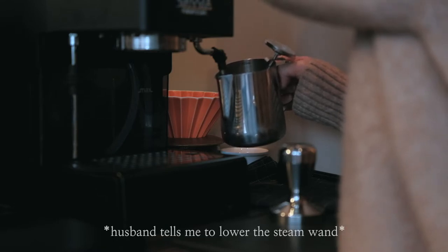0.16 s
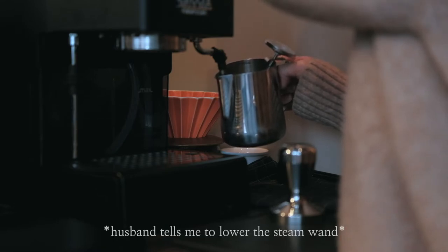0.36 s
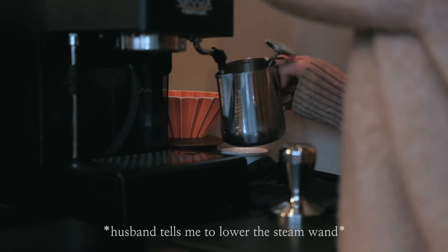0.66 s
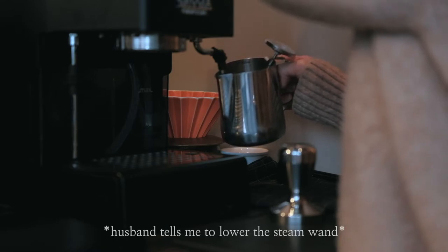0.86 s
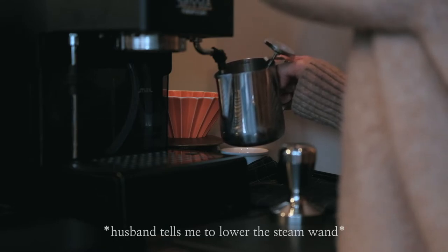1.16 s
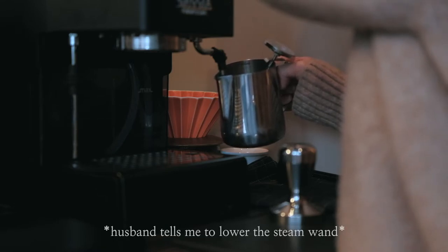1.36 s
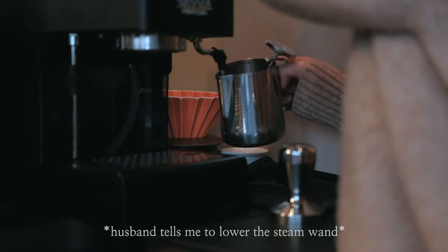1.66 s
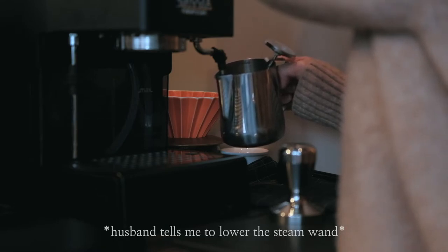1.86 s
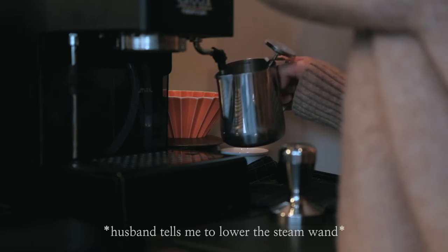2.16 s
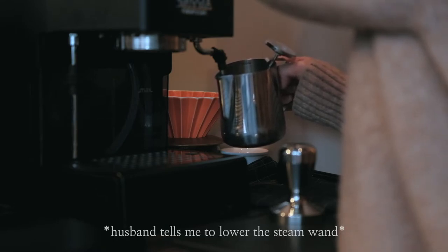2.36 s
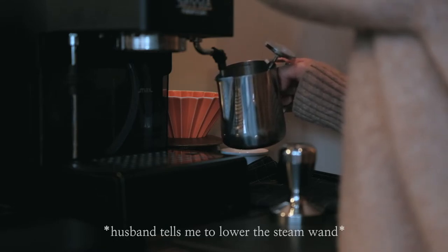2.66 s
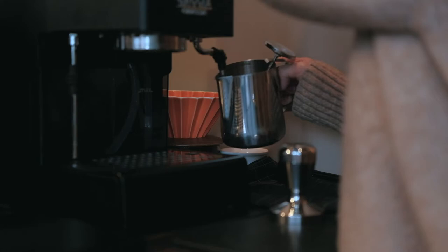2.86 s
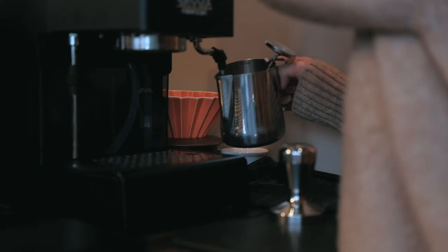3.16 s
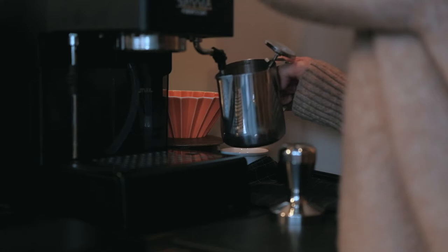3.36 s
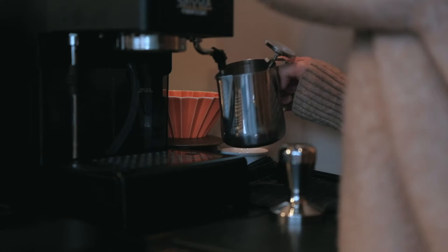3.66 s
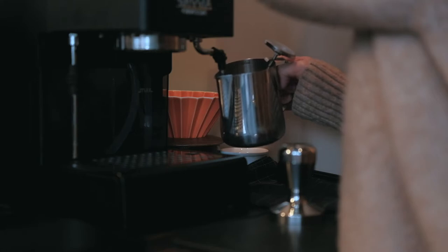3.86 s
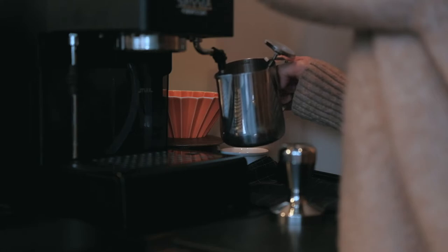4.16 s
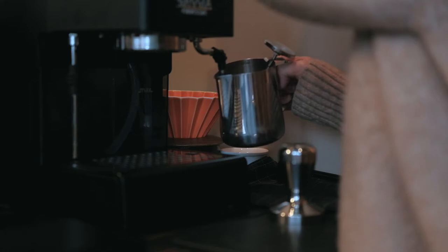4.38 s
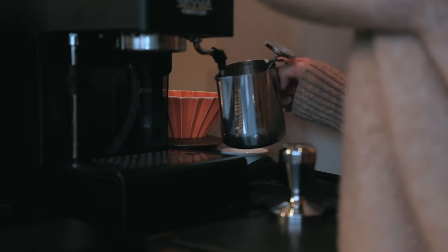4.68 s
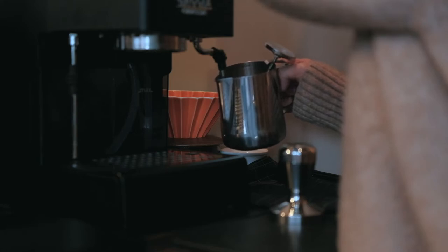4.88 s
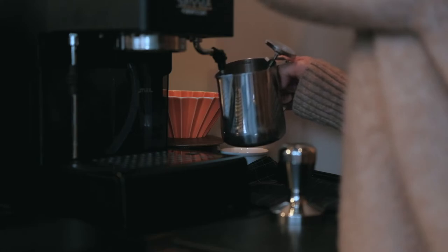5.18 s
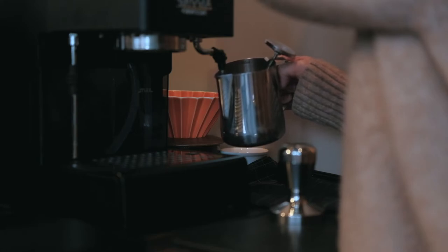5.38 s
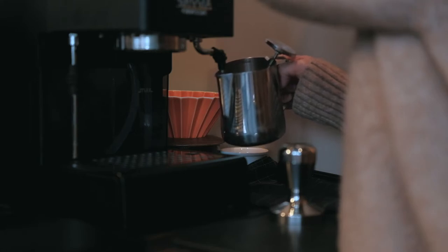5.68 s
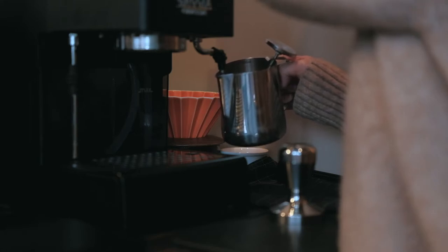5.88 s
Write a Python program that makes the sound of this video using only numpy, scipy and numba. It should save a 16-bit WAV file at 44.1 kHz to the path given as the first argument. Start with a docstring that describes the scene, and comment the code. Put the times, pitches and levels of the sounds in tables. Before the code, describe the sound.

In a small, reflective kitchen, a steam wand is already running in milk inside a steel pitcher, heard close in stereo. From 0 to about 2.4 seconds it makes a coarse, rasping screech, with two unsteady high whistles and rapid squealing surges over airy mist and hollow bubbling. Brief sizzles flicker early; a small spurt and sharp bubble ticks arrive near 2. The screech weakens around 2.4, then at 2.6 bright spray bursts out with a low slurp, sizzles and a stronger tick. A last squeal comes near 2.9. From about 3 seconds the mist thins and a softer, finer hiss takes over, with occasional harder pushes and faint hollow resonance. Around 4.7 to 5 another bright spit and wet gulps break in. The thinner fizz then continues unevenly to the end at 6, over faint low machine and room rumble, slightly stronger later.

```python
"""A steam wand froths milk in a steel pitcher in a small kitchen.
Clicks through moving resonances make a rasping, whistling screech that eases into a softer, finer hiss.
Bright spray spurts out near 2, 2.6 and 4.8 s, with sizzles, gulps and ticks from filtered clicks and noise.
Resonators ring the pitcher's steel and the air over the churning milk; room reflections and a low
filtered-noise rumble surround it."""
import sys
import numpy as np
from scipy import signal
from scipy.fft import rfft, irfft, next_fast_len
from scipy.io import wavfile
from scipy.ndimage import uniform_filter1d
from numba import njit

SR = 44100
rng = np.random.default_rng(int(sys.argv[2]) if len(sys.argv) > 2 else 0)


def digitize_waveform(pressure):
    """Quantize a signal to 16-bit integers and store it at the path in sys.argv[1].

    Rows of a 2-D input are taken as channels; values are limited to [-1, 1].
    """
    field = np.atleast_2d(pressure).T
    bounded = np.clip(field, -1, 1)
    quanta = np.round(bounded * 32767).astype(np.int16)
    wavfile.write(sys.argv[1], SR, quanta)


N = 265834
TIME = np.arange(N) / SR
FREQS = np.maximum(np.fft.rfftfreq(N, 1 / SR), 1)
# Table levels are set before the pitcher, mix and room.


def undb(db):
    """Decibels to gain."""
    return 10 ** (np.asarray(db) / 20)


def curves(table):
    """The columns of a table, joined by straight lines in time."""
    times, *columns = np.transpose(table)
    return [np.interp(TIME, times, column) for column in columns]


def unit(x):
    """Scale to rms 1."""
    return x / np.sqrt(np.mean(x ** 2))


def colour(x, points):
    """Filter by a spectrum of (frequency [Hz], gain [dB]) points, joined on a log-frequency axis."""
    hz, db = np.transpose(points)
    gain = undb(np.interp(np.log(FREQS), np.log(hz), db))
    return irfft(rfft(x) * gain, N)


def ring(x, modes):
    """Pass through parallel resonances of (frequency [Hz], width [Hz], gain [dB])."""
    response = sum(undb(db) / (1 + 1j * (FREQS ** 2 - hz ** 2) / (FREQS * width))
                   for hz, width, db in modes)
    return irfft(rfft(x) * response, N)


def ring_twice(x, hz, width_hz):
    """Two equal resonances in series narrow a shower of clicks to one singing band of rms 1."""
    mode = [(hz, width_hz, 0)]
    return unit(ring(ring(x, mode), mode))


@njit
def sweep(x, hz, width):
    """State-variable band-pass whose centre moves every sample; gain 1 at the centre."""
    y, band, low = np.empty(len(x)), 0., 0.
    for i in range(len(x)):
        g, damping = np.tan(np.pi * hz[i] / SR), width / hz[i]
        v = (band + g * (x[i] - low)) / (1 + g * (g + damping))
        band, low = 2 * v - band, low + 2 * g * v
        y[i] = damping * v
    return y


def sweep_twice(x, hz, width_hz):
    """Two equal moving band-passes in series."""
    return sweep(sweep(x, hz, width_hz), hz, width_hz)


def walk(rate):
    """Smooth random wander of rms 1 that takes a new direction rate times a second."""
    hold = max(int(SR / rate), 2)
    steps = rng.standard_normal(N // 16)[np.arange(N) // hold % (N // 16)]
    return unit(uniform_filter1d(steps, hold))


def pops(per_s, spread_db):
    """A dense shower of tiny clicks with random sign and size, at rms 1."""
    happens = rng.random(N) < per_s / SR
    signs = np.sign(rng.standard_normal(N))
    return unit(happens * signs * undb(spread_db * rng.standard_normal(N)))


def swirl(x, rate, depth_db, count=16):
    """Foam drifting past the tip shades each frequency band in its own time."""
    size = next_fast_len(N)
    hz = np.maximum(np.fft.rfftfreq(size, 1 / SR), 1)
    place = np.interp(np.log(hz), np.log([1500, 16000]), [0, count - 1])
    spectrum = rfft(x, size)
    shaded = 0
    for k in range(count):
        overlap = np.maximum(1 - abs(place - k), 0)  # triangular bands that add up to 1
        band = irfft(spectrum * overlap, size)[:N]
        shaded = shaded + band * undb(depth_db * walk(rate))
    return shaded


def sputter(per_s, fade_s, depth):
    """A gain that jumps at each spit and sinks back exponentially."""
    spits = (rng.random(N) < per_s / SR) * rng.uniform(.4, 1, N)
    fading = signal.lfilter([1], [1, -np.exp(-1 / (fade_s * SR))], spits)
    return unit(1 + depth * fading)


ATTACK_S, RELEASE_S = 0.0092, 0.03  # default ramps of a swell


def swells(rows, attack_s=ATTACK_S, release_s=RELEASE_S):
    """Summed gain of (time [s], length [s], level [dB]) events, timed between half-gain points."""
    total = 0
    for s, length, db in rows:
        rise, fall = (TIME - s) / attack_s, (s + length - TIME) / release_s
        total = total + undb(db) * np.clip(np.minimum(rise, fall) + .5, 0, 1)
    return total


def loudness(db, rows):
    """A running level with events on top, added in power."""
    return np.hypot(undb(db), swells(rows))


# Steaming over time, also played by hiss and churn: (time [s], collapsing-bubble level [dB],
# jet fizz level [dB], rolling-milk level [dB], fizz pitch [Hz])
STEAMING_LEVELS = [(0, -45, -55, -62.5, 4800), (1.0, -44, -53, -62.5, 4430), (1.9, -45.5, -51, -63.5, 4180),
                   (2.0, -46, -50.5, -63, 4280), (2.3, -44.5, -51.5, -62.5, 4100),
                   (2.38, -49.5, -51.5, -65.5, 4200), (2.58, -47, -48.5, -66, 3970),
                   (2.7, -58.5, -50.5, -59, 4230), (3.2, -58, -51, -59, 4280), (3.55, -55, -50, -61, 4380),
                   (3.85, -58.5, -50.5, -65, 4330), (4.55, -59, -52, -66.5, 4300),
                   (4.8, -55.5, -52, -68, 4530), (4.93, -62, -57.5, -66, 4670), (5.06, -66, -51, -67, 4250),
                   (5.28, -62, -54.5, -64, 3800), (5.5, -61, -53.5, -60.5, 3860),
                   (5.67, -58, -54.5, -63, 3820), (5.9, -61, -51.5, -72, 3780), (6.03, -62, -55, -62, 3850)]
# Swells of the screeching bubble cloud: (time [s], length [s], level [dB], resonance [Hz])
CLOUD_SURGES = [(0, 0.056, -42.5, 2740), (0.101, 0.052, -45, 2620), (0.255, 0.018, -43, 3300),
                (0.349, 0.16, -43.5, 2660), (0.561, 0.089, -46, 3730), (0.635, 0.064, -43, 2660),
                (0.736, 0.021, -45.5, 3630), (0.771, 0.094, -50, 2830), (.86, 0.069, -43.5, 3370),
                (0.9, 0.11, -47, 2760), (1.168, 0.064, -45.5, 3300), (1.302, 0.067, -42, 2860),
                (1.488, 0.1, -47, 3470), (1.603, 0.1, -44, 2810), (1.726, 0.078, -48.5, 3580),
                (1.778, 0.056, -41, 2800), (1.846, 0.058, -42.5, 2680), (1.91, 0.046, -40.5, 2650),
                (1.977, 0.13, -49.5, 2830), (2.085, 0.056, -40, 2740), (2.195, 0.05, -40, 3150),
                (2.406, 0.064, -46.5, 3580), (2.468, .03, -44.5, 3070), (2.53, .07, -46.5, 3440),
                (2.882, 0.032, -46, 3680), (2.939, 0.049, -41.5, 2940)]
# Two whistling strands: (time [s], lower pitch [Hz], upper pitch [Hz],
# lower level against the rasp [dB], upper level against the rasp [dB])
WHISTLE_STRANDS = [(0, 2720, 3350, -5, -7), (0.25, 2720, 3140, -9, -2), (0.42, 2684, 3200, -1, -7),
                   (0.6, 2730, 3480, -7.5, -7.5), (0.9, 2685, 3400, -1, -6), (1.22, 2710, 3290, -6, -1.5),
                   (1.42, 2675, 3510, -1, -5), (1.68, 2800, 3510, -1, 0.5), (1.9, 2650, 3300, -1.5, -2.5),
                   (2.0, 2820, 3450, 2, -2), (2.25, 2813, 3540, -3, -3.5), (2.42, 2810, 3600, -12, -11),
                   (2.96, 2930, 3420, -5.5, -8)]
# Tone of collapsing bubbles: (frequency [Hz], gain [dB])
COLLAPSE_TONE = [(1200, -47), (1800, -13.5), (2000, -12), (2380, -7.5), (2620, -5), (3020, -6), (3500, -2),
                 (4300, -14), (5100, -25), (6300, -21), (7800, -36), (9400, -31), (11000, -28),
                 (15500, -46)]
CLOUD_HZ = 3084  # cloud resonance between surges
CLOUD_DRIFT_DB = 0.48  # its pitch wander, as 20 log10 of the frequency ratio
SQUEAL_SHARE = 0.29  # share of a surge's power in one narrow squeal


def screech():
    """Imploding bubbles spit and ring their cloud; two strands whistle and each surge squeals."""
    steady_db, _, _, _ = curves(STEAMING_LEVELS)
    low_hz, high_hz, low_db, high_db = curves(WHISTLE_STRANDS)
    steady_power = undb(steady_db) ** 2
    surges = [(swells([(s, length, db)]) ** 2, hz) for s, length, db, hz in CLOUD_SURGES]
    power = steady_power + sum(surge for surge, _ in surges)

    # The louder of cloud and surge pulls the resonance its way.
    resting_hz = CLOUD_HZ * undb(CLOUD_DRIFT_DB * walk(30))
    cloud_hz = (resting_hz * steady_power + sum(surge * hz for surge, hz in surges)) / power

    spits = sputter(per_s=90, fade_s=0.0032, depth=0.8)
    implosions = pops(per_s=10000, spread_db=2.0) * spits
    cloud = sweep(implosions, cloud_hz * undb(0.36 * walk(70)), 550.0)
    rasp = swirl(implosions, rate=60, depth_db=4.0, count=22)
    wash = unit(colour(0.28 * rasp + cloud, COLLAPSE_TONE))

    def sing(centre_hz, width_hz):
        """Narrow a fresh shower of spitting clicks to a whistle."""
        return unit(sweep_twice(pops(per_s=8000, spread_db=1.5) * spits, centre_hz, width_hz))

    low_strand = undb(low_db) * sing(low_hz * undb(0.15 * walk(35)), 197.0)
    high_strand = undb(high_db) * sing(high_hz * undb(0.25 * walk(25)), 245.0)
    body = (wash + low_strand + high_strand) / np.sqrt(1 + undb(low_db) ** 2 + undb(high_db) ** 2)

    squealing = np.clip(SQUEAL_SHARE * (1 - steady_power / power), 0, 1)
    mixed = np.sqrt(1 - squealing) * body + np.sqrt(squealing) * sing(cloud_hz, 290.0)
    return mixed * np.sqrt(power) * undb(0.67 * walk(45))


# Mist over the foam: (time [s], level [dB])
MIST_LEVEL = [(0, -56), (0.15, -57.5), (0.2, -52), (0.4, -55.5), (0.57, -59.5), (0.7, -56), (0.95, -55.5),
              (1.12, -58.5), (1.38, -56), (1.5, -56.5), (1.92, -56.5), (2.0, -57), (2.4, -57), (2.95, -58),
              (3.05, -74), (5.4, -68), (6.03, -67)]
# Tone of the mist: (frequency [Hz], gain [dB])
MIST_TONE = [(2000, -24), (5000, -8.5), (5600, 4), (5950, 3.5), (6400, 2.5), (7000, -1.5), (8000, -12),
             (8900, 1), (9400, 0), (10100, -5.5), (12000, -7.5), (15500, -16.5)]


def mist():
    """A dense shower of equal droplets makes an airy mist that thins at about 3 s as the tip sinks."""
    level_db, = curves(MIST_LEVEL)
    droplets = pops(per_s=20000, spread_db=0.0) * sputter(per_s=77, fade_s=0.0024, depth=0.37)
    return unit(colour(swirl(droplets, rate=70, depth_db=4.5), MIST_TONE)) * undb(level_db)


# Harder pushes of the jet: (time [s], length [s], level [dB])
JET_PUSHES = [(0.013, 0.055, -50.5), (1.095, 0.034, -51.5), (2.41, 0.075, -53), (2.88, 0.018, -49),
              (3.37, 0.14, -50), (4.118, 0.037, -48.5), (4.18, 0.055, -50.5), (4.755, 0.033, -55),
              (5.208, 0.017, -52)]
# Tone of the fine fizz: (frequency [Hz], gain [dB])
HISS_TONE = [(1200, -32), (1900, -44), (2300, -11), (2900, -4.5), (3300, -7.5), (3750, -6.5), (4400, -4.5),
             (4900, -6.5), (5400, -7.5), (6700, -14), (7500, -10.5), (8600, -15.5), (11500, -23.5),
             (12800, -33), (15000, -44)]


def hiss():
    """The submerged jet fizzes with fine bubbles; their resonance wanders down as the foam thickens."""
    _, level_db, _, fizz_hz = curves(STEAMING_LEVELS)
    bubbles = pops(per_s=14000, spread_db=1.5) * undb(0.52 * walk(130))
    fizz = swirl(bubbles, rate=75, depth_db=2.5, count=22)
    singing = sweep(fizz, fizz_hz * undb(0.36 * walk(45)), 700.0)
    steady = unit(colour(fizz + 0.81 * singing, HISS_TONE))
    push_fizz = sweep(pops(per_s=14000, spread_db=1.5), fizz_hz, 1100.0)
    pushed = unit(colour(push_fizz, HISS_TONE))
    return steady * undb(level_db) + pushed * swells(JET_PUSHES)


# Pitcher moving under the wand, also played by churn and scene:
# (time [s], tip shift [0-1], bubbling pitch [Hz], notch frequency [Hz])
TIP_POSITION = [(0, 0.75, 940, 1810), (0.2, 0.4, 953, 1780), (1.2, 0.1, 927, 1690), (1.45, 0.6, 945, 1680),
                (1.94, 0.22, 970, 1770), (1.99, 0.63, 945, 1630), (2.55, 0.7, 960, 1580),
                (2.62, 0.74, 990, 1850), (2.68, 1, 960, 1910), (2.88, 0.77, 965, 1860),
                (3.15, 0.85, 898, 1860), (4.7, 0.65, 883, 1920), (4.9, 0.64, 970, 1970),
                (5.2, 0.8, 1007, 1780), (6.03, 0.84, 1120, 1760)]


def pitcher(x, modes):
    """Where the tip sits decides how strongly it drives each mode: a blend of two gain sets."""
    shift = np.clip(curves(TIP_POSITION)[0], 0, 1)
    unshifted = ring(x, [(hz, width, db) for hz, width, db, _ in modes])
    shifted = ring(x, [(hz, width, db) for hz, width, _, db in modes])
    return (1 - shift) * unshifted + shift * shifted


# Milk heaving against the pitcher: (time [s], length [s], main air resonance level [dB],
# upper air resonance level [dB])
MILK_SLOSHES = [(0, 0.1, -58, -79), (.17, 0.074, -63, -57.5), (0.786, 0.071, -59.5, -58),
                (1.207, 0.21, -82, -58.5), (1.54, 0.068, -66, -53), (1.66, 0.29, -66, -66),
                (2.122, 0.5, -67.5, -71), (2.62, 0.167, -57.5, -80), (2.855, 0.048, -53.5, -71),
                (3.322, 0.14, -57.5, -61), (4.239, 0.069, -59.5, -68), (4.831, 0.076, -57.5, -56),
                (4.91, 0.13, -63, -71)]
# Air above the milk: (frequency [Hz], width [Hz], gain at shift 0 [dB], gain at shift 1 [dB])
AIR_MODES = [(540, 63, -20, -3), (811, 41, 3.5, 2), (878, 57, -3, 2.5), (925, 32, 8.5, 6.5),
             (1037, 36, 5, 0), (1179, 84, 0, 0.5), (1377, 99, 5.5, -20), (1530, 47, 1, -4.5),
             (1860, 91, 2.5, -37)]
UPPER_DB, UPPER_SHIFT_DB = -57.5, -4.5  # upper resonance level, and its change at shift 1


def churn():
    """Rolling milk rings the air in the pitcher; its wavering bubbling picks out resonances in turn."""
    _, _, roll_db, _ = curves(STEAMING_LEVELS)
    shift, bubbling_hz, _ = curves(TIP_POSITION)
    main_rows = [(s, length, db) for s, length, db, _ in MILK_SLOSHES]
    upper_rows = [(s, length, db) for s, length, _, db in MILK_SLOSHES]
    main_gain = loudness(roll_db + 0.2 * walk(12), main_rows)
    upper_gain = loudness(UPPER_DB + UPPER_SHIFT_DB * shift + 0.83 * walk(14), upper_rows)

    slaps = pops(per_s=6000, spread_db=2.0) * undb(.5 * walk(60))
    wavering_hz = bubbling_hz * undb(0.16 * walk(16))
    bubbling = sweep_twice(pops(per_s=6000, spread_db=2.5), wavering_hz, 256.0)
    hollow = pitcher(bubbling, AIR_MODES)
    upper = colour(pitcher(slaps, AIR_MODES), [(200, -6), (500, -13.0), (930, -8.5), (1200, 0.5),
                                               (2000, 2.5), (2600, 8.0), (5000, -33)])
    return unit(hollow) * main_gain + unit(upper) * upper_gain


# Tone of the machine and room rumble: (frequency [Hz], gain [dB])
KITCHEN_TONE = [(15, -47), (25, -18), (223, 1.5), (264, -2.5), (312, 0), (454, -6), (545, -1), (635, -8.5),
                (700, -1), (910, -35), (1540, -120)]


def kitchen():
    """Low filtered noise of machine and room, partly alike on both sides, grows from 2.2 to 3.9 s."""
    shared = rng.standard_normal(N)
    rumble = colour(shared + 1.23 * rng.standard_normal((2, N)), KITCHEN_TONE)
    level_db = np.interp(TIME, [0, 2.2, 3.9, 6], [-71.0, -71.0, -67.5, -68.0])
    return unit(rumble) * undb(level_db + 0.099 * walk(3.7))


# Narrow-band sizzles of the spray: (time [s], length [s], level [dB], pitch [Hz])
SIZZLE_NOTES = [(0.198, 0.059, -52.5, 5900), (0.299, 0.076, -50.5, 6100), (1.063, 0.018, -58, 8650),
                (1.306, .025, -53, 6060), (1.383, .04, -53, 6600), (1.923, 0.025, -57, 6000),
                (2.592, 0.02, -45.5, 6450), (2.704, 0.03, -49, 6840), (2.877, 0.031, -52, 6900)]


def sizzle():
    """Tiny bubbles of one size sing briefly at the surface."""
    bubbles = pops(per_s=11000, spread_db=0.5)
    return sum(ring_twice(bubbles, hz, width_hz=1250) * swells([(s, length, db)])
               for s, length, db, hz in SIZZLE_NOTES)


# Lingering air resonances: (time [s], length [s], level [dB], pitch [Hz])
HOOT_NOTES = [(0.2, 1.65, -66.5, 933.7), (2.116, 0.5, -64.5, 937), (2.222, 0.43, -63.5, 1175),
              (2.6, 0.19, -65, 1036), (2.62, 0.3, -57.5, 933), (3.12, 1.1, -71.5, 1597),
              (5.62, 0.47, -68, 1042)]
HOOT_EDGE_S = 0.05  # both ramps of a hoot


def hoots():
    """For a while the rolling milk keeps one air resonance of the pitcher sounding."""
    bubbles = pops(per_s=6000, spread_db=1.0)
    return sum(ring_twice(bubbles, hz, width_hz=42) * swells([(s, length, db)], HOOT_EDGE_S, HOOT_EDGE_S)
               for s, length, db, hz in HOOT_NOTES)


# Single large bubbles bursting: (time [s], starting level before the tone filter [dB])
BUBBLE_BURSTS = [(1.792, -43), (1.885, -38), (1.949, -36), (2.2079, -36), (2.6, -34), (2.731, -27.5),
                 (2.96, -35), (3.1183, -38), (4.7232, -50)]


def bursts(t60=0.036):
    """A large bubble ends in a short, sharp tick: noise that fades 60 dB in t60 seconds."""
    fades = sum(undb(db - 60 * np.maximum(TIME - s, 0) / t60) * (TIME >= s) for s, db in BUBBLE_BURSTS)
    return colour(rng.standard_normal(N) * fades, [(200, -55), (1000, -37.0), (2800, 1), (4500, -2),
                                                   (9000, -17), (15000, -35)])


# The tip breaking the surface: (time [s], length [s], level [dB])
SPRAY_SPURTS = [(1.95, 0.1, -60), (2.59, 0.31, -54.5), (2.655, .03, -56), (2.765, 0.033, -53),
                (4.715, 0.04, -56), (4.845, 0.18, -53.5)]
# Tone of the spray: (frequency [Hz], gain [dB])
SPRAY_TONE = [(2000, -38), (4500, 1), (6500, 2), (7100, 6), (8200, 0), (9000, 5.5), (9350, 8.5),
              (9800, 0.5), (11000, 4.5), (12500, -6), (13800, 3), (15700, 0.5)]


def spray():
    """Steam escaping at the surface tears off a dense, bright spray that sputters and trails off."""
    spits = sputter(per_s=180, fade_s=0.0028, depth=0.45)
    drops = pops(per_s=19000, spread_db=2.5) * spits * undb(1.0 * walk(45))
    bright = unit(colour(swirl(drops, rate=67, depth_db=2.5), SPRAY_TONE))
    return bright * swells(SPRAY_SPURTS, attack_s=0.012, release_s=0.025)


# The tip gulping air: (time [s], length [s], level [dB])
AIR_GULPS = [(2.597, 0.28, -58.5), (4.842, 0.098, -52.5), (4.927, 0.14, -58.5)]


def gulps():
    """Air drawn under the surface gives a short, low slurp of unequal clicks."""
    swell = sum(undb(db) * np.interp(TIME, [s, s + length / 10, s + length / 2, s + length], [0, 1, 1, 0])
                for s, length, db in AIR_GULPS)
    slurp = colour(pops(per_s=2200, spread_db=7.0),
                   [(50, -50), (150, -43), (360, 1), (450, -8.0), (550, 1.5), (680, -3.0),
                    (950, 11.5), (1500, -9.5), (2200, -27), (5000, -45)])
    return unit(slurp) * swell


# Stereo space: (frequency [Hz], reflections against direct sound [dB],
# left minus right level [dB], phase lead of the left in the direct sound [rad])
STEREO_SPACE = [(300, -3, -1, .01), (810, -7.5, -4, 0.018), (1590, -8, -1.5, 0.028), (2860, -0.5, -2, 0.23),
                (3420, -5, 1, 1), (4630, -2.5, 1.5, 0.69), (5430, -9, 0, 0.99), (7800, 0.5, 0.5, 0.26),
                (14700, -12, 0, .02)]


def room(x, t60=0.34):
    """Direct sound plus dense decaying reflections from machine and tiles, at two close microphones."""
    hz, *columns = np.transpose(STEREO_SPACE)
    wet_db, pan_db, lead = (np.interp(np.log(FREQS), np.log(hz), column) for column in columns)
    sides = np.array([[1], [-1]])  # left, right
    tail = rng.standard_normal((2, N)) * undb(-60 * TIME / t60) * (TIME > .002)
    tail /= np.sqrt(np.sum(tail ** 2, axis=1, keepdims=True))
    direct = np.exp(1j * sides * lead / 2)
    paths = direct + undb(wet_db) * rfft(tail)
    balance = undb(sides * pan_db / 2) / np.sqrt(1 + undb(wet_db) ** 2)
    return irfft(rfft(x) * paths * balance, N)


# Steel pitcher with its milk: (frequency [Hz], width [Hz], gain at shift 0 [dB], gain at shift 1 [dB])
STEEL_MODES = [(2608, 132, 2, -40), (2778, 56, -0.5, -18), (2862, 55, -25, -3.5), (2976, 68, -35, -4),
               (3266, 21, -1, -3), (3510, 35, -3.5, -16), (3560, 50, -3, -20), (3684, 57, -6, 2.5),
               (3870, 110, 1, 2), (4090, 78, -2, -2), (4277, 37, -3, 6.5), (4484, 50, -3, 8),
               (4690, 96, -1, -1), (4863, 65, 4, 4), (5550, 390, 0, -11.5), (6400, 950, 0, -26),
               (9470, 240, 1, -28)]


def scene():
    """The jet's noises ring the steel; the echo off its wall weakens one narrow moving band."""
    _, _, notch_hz = curves(TIP_POSITION)
    steam = screech() + mist() + hiss()
    steel = pitcher(steam, STEEL_MODES)
    milk = churn() + sizzle() + hoots() + bursts() + spray() + gulps()
    sound = 0.86 * steam + .75 * steel + milk
    sound = sound - 0.65 * sweep(sound, notch_hz, 290.0)
    return room(sound) + kitchen() * undb([[-1.1], [1.1]])  # rumble leans right


def record(dry):
    """A steep elliptic low-pass cuts the top above 15.7 kHz."""
    return signal.sosfilt(signal.ellip(10, .2, 70, 15700, fs=SR, output="sos"), dry)


dry = scene()
out = record(dry)
digitize_waveform(out)
```